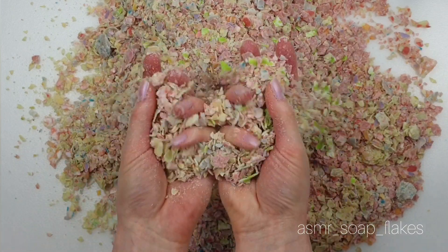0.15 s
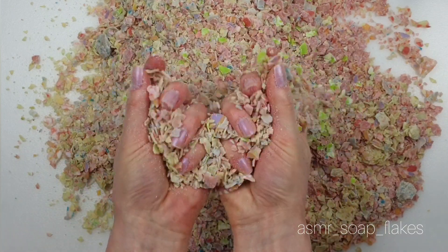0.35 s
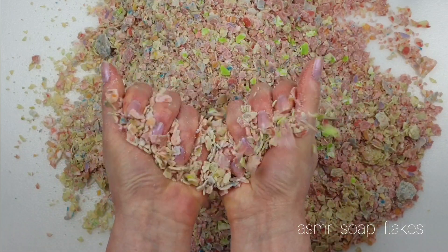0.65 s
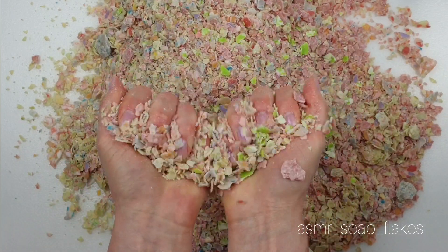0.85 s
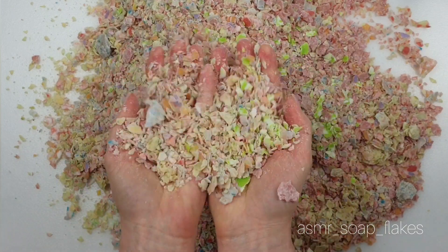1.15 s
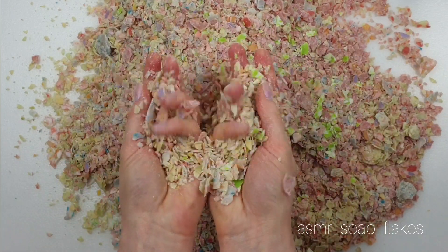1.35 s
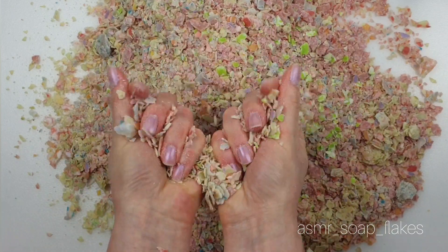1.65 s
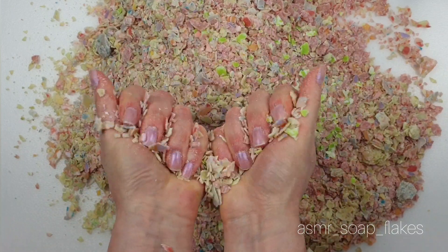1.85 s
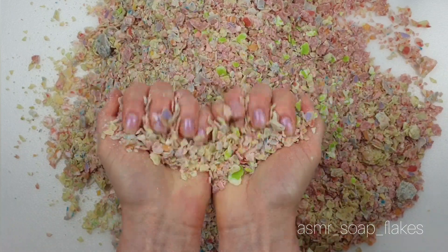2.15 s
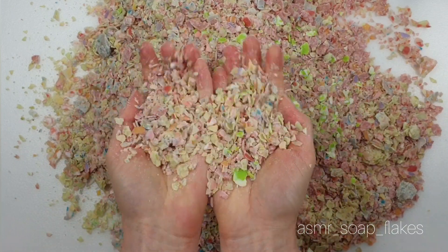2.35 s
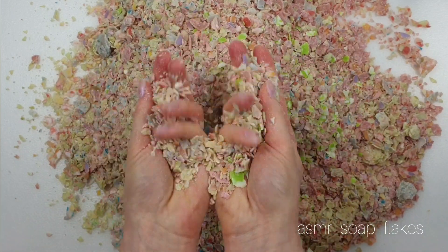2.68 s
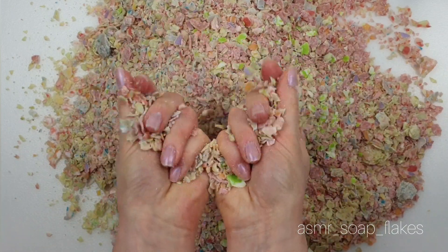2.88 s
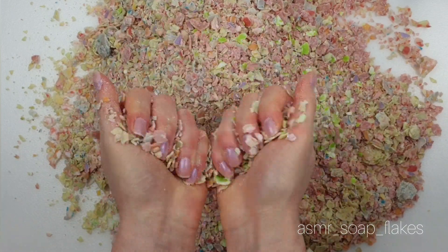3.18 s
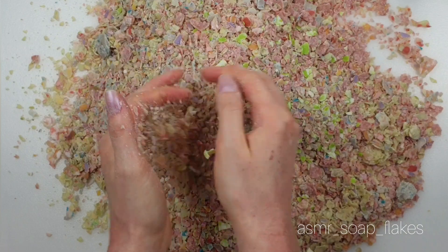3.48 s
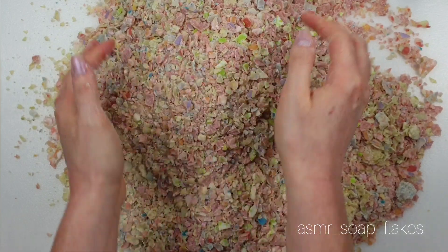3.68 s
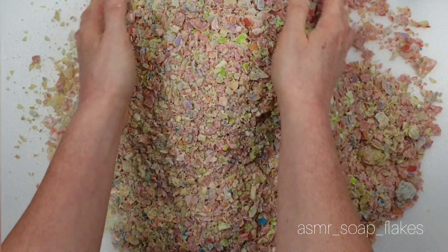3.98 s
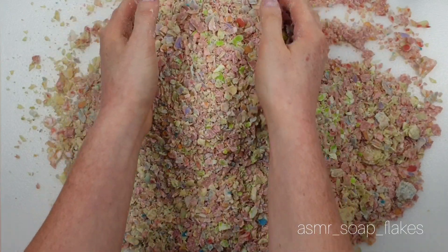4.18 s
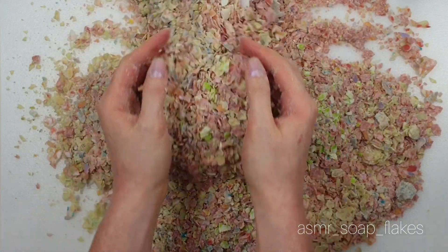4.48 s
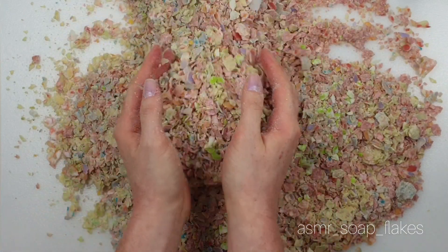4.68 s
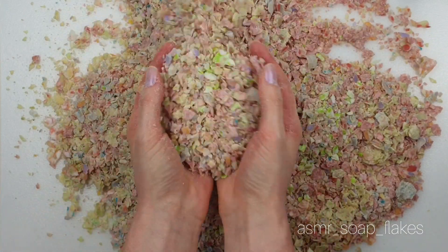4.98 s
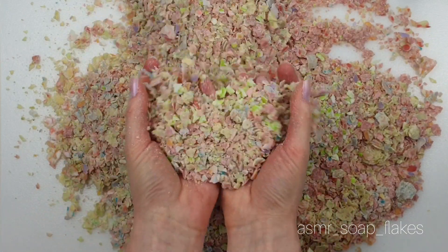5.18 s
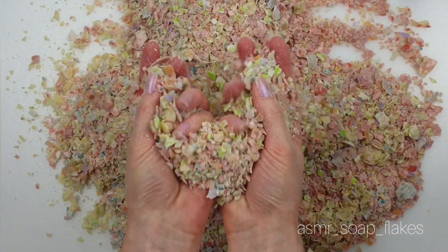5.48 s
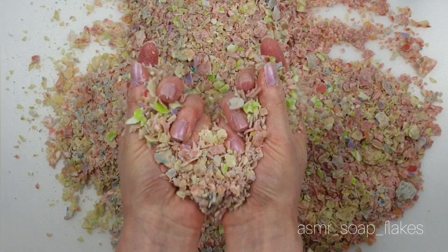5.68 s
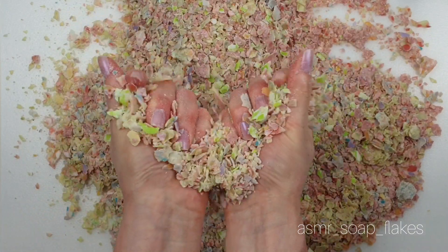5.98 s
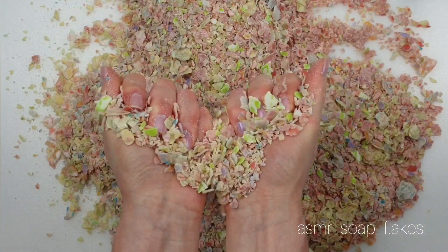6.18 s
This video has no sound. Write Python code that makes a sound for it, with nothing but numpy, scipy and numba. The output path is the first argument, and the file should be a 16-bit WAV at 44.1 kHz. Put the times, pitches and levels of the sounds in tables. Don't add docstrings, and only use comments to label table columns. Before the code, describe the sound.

Dry soap flakes are handled by two hands just under a spaced pair of microphones, in a small, quiet room with a faint low fridge hum. From 0 to 3 seconds the hands knead: thin, bright rustling, thousands of tiny ticks, swelling and easing, with many brittle snaps, strongest in the first second, including a sharp crack with a light knock near 1.0. A short slide swells around 1.65. Between 3.3 and 3.6 the flakes pour out in a bright rush, then nearly hush at about 3.8. Knocks at 3.86 start a firm push, a dull drumming, crunching sweep over the hard tabletop peaking near 4.0. From 4.3 to 5.1 gathering is softer, with muted rubbing. From 5.2 the kneading returns, fullest around 5.4 to 5.6, with crisp snaps, mostly slightly left, continuing to the end at about 6.3. Echo is very short.

```python
import sys
import numpy as np
from scipy import signal
from scipy.fft import rfft, irfft
from scipy.io import wavfile
from scipy.ndimage import uniform_filter1d
from numba import njit

SR = 44100
rng = np.random.default_rng(int(sys.argv[2]) if len(sys.argv) > 2 else 0)


def unload_wav(signal):
    wavfile.write(
        sys.argv[1],
        SR,
        np.round(np.clip(np.atleast_2d(signal).T, -1, 1) * 32767).astype(np.int16),
    )


def attenuation_scalar(level_db):
    decades = np.asarray(level_db, float) / 20
    return 10 ** decades


N = 279153
SPACING_S = .0005

# time_s, flow_db
SIFT = [(0, -41), (.22, -43), (.66, -49), (.97, -55), (1.5, -48.5), (1.87, -54.5), (2.2, -52), (2.55, -55),
        (2.97, -51), (3.29, -55), (3.7, -51.5), (3.84, -82.5), (3.94, -58), (4.4, -57), (4.95, -53),
        (5.17, -49.5), (5.3, -44.5), (6.33, -50)]
# pitch_hz, level_db (per Hz)
TICK_TOP = [(5000, -51.5), (8500, -14.5), (9630, -13), (12800, 1.5), (14400, -0.5), (16200, -7.5),
            (16400, -28), (16500, -77)]
# pitch_hz, level_db (per Hz)
TICK_MID = [(2240, -50.5), (3800, -16), (6020, -8), (6160, -7), (7180, -1), (8310, -11), (9500, -10),
            (12400, -23), (20900, -120)]
# pitch_hz, level_db (per Hz)
CRUNCH_TOP = [(1700, -34.5), (2500, -5), (3000, -4), (3500, -8.5), (4200, -1), (5500, -3.5), (8000, -42.5)]
# pitch_hz, width_hz, level_db
TABLE_MODES = [(220, 60, -9.5), (250.6, 20, -7), (324.6, 36, -12), (381.2, 36.7, -3), (446, 23, 0.5),
               (498.3, 27.4, -2.5), (595, 97, -7.5), (661, 71, -2.5), (736, 96.6, -1.5), (797, 138, -3.5),
               (953, 137, -7), (1148, 207, -12.5)]


def unit(x):
    return x / np.sqrt(np.mean(x ** 2))


def response(points, size=2048):
    hz, db = np.transpose(points)
    bins_hz = np.arange(size // 2 + 1) * SR / size
    log_gain = np.interp(np.log(bins_hz + 1), np.log(hz), db) * np.log(10) / 20
    cepstrum = irfft(log_gain)
    cepstrum[1:size // 2] *= 2
    cepstrum[size // 2 + 1:] = 0
    return irfft(np.exp(rfft(cepstrum)))


def through(x, h):
    return signal.fftconvolve(x, np.atleast_2d(h), axes=1)[:, :N]


def walk(rate):
    hold = int(SR / rate)
    goals = np.repeat(rng.standard_normal(N // hold + 1), hold)[:N]
    drift = signal.lfilter([1 / hold], [1, 1 / hold - 1], goals)
    return drift / drift.std()


@njit
def ring(at, hz, decay, size):
    out = np.zeros(N)
    for g in range(len(at)):
        first = int(at[g]) + 1
        turn = np.exp(2j * np.pi * hz[g] / SR - decay[g])
        swing = size[g] * turn ** (first - at[g])
        for j in range(first, min(N, first + int(6 / decay[g]) + 1)):
            out[j] += swing.real
            swing *= turn
    return out


def place(s, hz, ring_s, db, pan_db, side):
    one = np.ones(len(s))
    ears = []
    for ear in (-1, 1):
        at = np.clip((s + ear * side * SPACING_S / 2) * SR, 0, N)
        size = attenuation_scalar(db - ear * pan_db / 2) * one
        ears.append(ring(at, hz * one, one / (ring_s * SR), size))
    return np.array(ears)


def shower(rate, scatter_db, spread_db, width, ring_s, lo_hz, hi_hz):
    when, big, pitch, side = rng.random((int(rate * N / SR), 4)).T
    db = -scatter_db * np.log(1 - .985 * big)
    where = 2 * side - 1
    hz = lo_hz + (hi_hz - lo_hz) * pitch
    return unit(place(when * N / SR, hz, ring_s, db, spread_db * where, width * where))


def swells(table):
    s, db, rise_s, fall_s, share_db = np.transpose(table)[:, :, None]
    t = np.arange(0, N, 64) / SR - s
    power = attenuation_scalar(2 * db - 40 * np.maximum(-t / np.abs(rise_s), t / np.abs(fall_s)))
    return [np.repeat(np.sqrt(p.sum(0)), 64)[:N] for p in (power, power * attenuation_scalar(2 * share_db))]


def moving():
    # peak_s, level_db, rise_s and fall_s (per 20 dB),
    # mid_share_db (7 kHz part)
    surges = [(.33, -46.5, -1.5, 1, -22), (.6, -52.5, 5, 0.1, -1), (.86, -48.5, 1, .11, -12),
              (1.1, -50.5, 1.3, .2, -5.5), (1.43, -53, 0.5, -1, -9), (1.65, -44, 0.16, 0.16, -4),
              (2.68, -50.5, .2, 0, -17.5), (3.33, -46, 0.08, 0.54, -5.5), (3.5, -40.5, 0.22, 0.2, -10.5),
              (4.07, -48.5, 0.09, 0.13, 2), (4.29, -58, -0.3, 0.9, -1), (4.62, -53, 0.1, 0.07, -2.5),
              (4.84, -55.5, 0.5, 0.17, -1.5), (5.39, -43.5, .5, .5, -9.5), (5.6, -44.5, 0.45, -1, -9),
              (5.98, -49.5, -1.6, -1.2, -7.5), (6.16, -53, 1, 0, -2.5)]
    creep = attenuation_scalar(np.interp(np.arange(N) / SR, *np.transpose(SIFT)))
    surge, surge_mid = swells(surges)
    flow = np.hypot(creep, surge)
    return flow, np.hypot(creep * attenuation_scalar(-8.5), surge_mid) / flow


def air():
    # pitch_hz, level_db (per Hz)
    room_colour = [(12, -54), (20, -2), (65, -1), (118, 1), (154, -16), (240, -25.5), (446, -11.5),
                   (569, -32), (1350, -23.5), (4000, -21), (5200, -66), (8800, -120)]
    mid, side = through(rng.standard_normal((2, N)), response(room_colour, size=8192))
    side = signal.lfilter(*signal.butter(1, 500, "high", fs=SR), side) + 0.22 * side
    return attenuation_scalar(-76.5 + 2.5) * unit(np.array([mid + side, mid - side]))


def fridge():
    # pitch_hz, level_db (rms), phase_turns
    hum = [
        (49.22, -67.5, .33),
        (98.46, -75, -.03),
        (100.02, -71, -.36),
    ]
    t = np.arange(N) / SR
    lines = sum(np.sqrt(2) * attenuation_scalar(db) * np.cos(2 * np.pi * (f * t + turns)) for f, db, turns in hum)
    waver_db = 0.9 * uniform_filter1d(np.array([walk(5.5), walk(11)]), size=800)
    return lines * attenuation_scalar(np.array([[-.4], [.4]]) + waver_db)


def table_top(modes):
    t = np.arange(8192) / SR
    h = np.zeros(len(t))
    for k, (hz, width_hz, db) in enumerate(modes):
        swing = np.exp(-np.pi * width_hz * t) * np.sin(2 * np.pi * hz * t)
        h += (-1) ** k * attenuation_scalar(db) * width_hz * swing
    h = signal.sosfilt(signal.butter(3, 185, "high", fs=SR, output="sos"), h)
    return h / np.sqrt(np.sum(h ** 2))


def knocks():
    # start_s, peak_db, pitch_hz, pan_db (left minus right)
    hits = [(0.085, -36, 770, 2), (0.667, -29, 1784, 4.5), (0.929, -45.5, 496, -1), (0.996, -31, 1733, -2),
            (0.9968, -28, 2200, -2.5), (0.996, -18, 3980, -2), (1.493, -49.5, 750, 5), (1.532, -42, 830, 5),
            (1.581, -36.5, 510, 0.5), (1.596, -38, 520, 2), (1.719, -33.5, 1655, 4), (2.006, -47, 404, 1),
            (3.764, -55, 740, 3), (3.852, -44, 700, -3), (3.857, -26, 836, 0.5), (3.891, -30, 750, -1),
            (4.219, -35, 1040, 4.5), (5.186, -48, 820, 6), (5.235, -45, 930, 9), (5.327, -43, 483, 2.5),
            (5.549, -44, 810, 10), (6.22, -36, 740, -1.5), (6.282, -45.5, 417, 0.5)]
    s, db, hz, pan_db = np.transpose(hits)
    side = np.clip(-pan_db / 12, -1, 1)
    thump = place(s + 0.001954, hz, 1.53 / hz, db, pan_db, side)
    thump = thump + place(s + 0.002507, 1.035 * hz, 16 / hz, db - 24, pan_db, side)
    thump = signal.sosfilt(signal.butter(2, [300, 5000], "band", fs=SR, output="sos"), thump)
    return thump + attenuation_scalar(-27) * through(thump, table_top(TABLE_MODES))


def drag():
    # peak_s, drumming_db, rise_s and fall_s (per 20 dB), crunch_share_db
    pushes = [(.1, -57.5, 6, 0.86, -8.5), (.64, -69, 0.7, 0.6, 5.5), (.9, -62, .6, .5, -18),
              (1.03, -65, 0.14, 0.15, 7.5), (1.6, -58, 0.28, 0.31, -8.5), (1.73, -67, 0.06, 0.08, 8),
              (1.95, -75, 0.1, .3, 8), (2.1, -63.5, .35, 0.38, -12.5), (2.95, -74, 1.5, 1.6, -9),
              (3.12, -79, .3, -1.1, 4), (3.33, -67, .4, .5, -6), (3.55, -64, .5, .9, -11),
              (3.885, -49, .025, 0, -1.5), (4.02, -43, .17, .28, -7), (4.15, -56.5, 0.01, .25, 2.5),
              (4.3, -62, 0.5, 0.07, -6), (4.72, -56.5, 0.41, 0.31, -11), (5.19, -68, .08, 4, -5),
              (5.4, -58, 0.25, .55, -9), (5.93, -67, .3, .3, 2.5), (6.25, -59, 0.47, -12, -6)]
    # pitch_hz, level_db (per Hz)
    crunch_colour = [(700, -29), (1200, -1.5), (1750, 1.5), (2400, -5.5), (2900, -20), (5000, -74.5)]
    force, grind = swells(pushes)
    firmness = np.maximum(force / attenuation_scalar(-67), 1) ** 0.12
    deep = np.hypot(force * attenuation_scalar(-14) * firmness, attenuation_scalar(-82))
    spill = attenuation_scalar(-64) * (moving()[0] / attenuation_scalar(-42.5)) ** 1.65
    bright = np.hypot(force * attenuation_scalar(-9), spill)

    thuds = shower(rate=2500, scatter_db=2.5, spread_db=-1.5, width=.6, ring_s=0.00017, lo_hz=207, hi_hz=1600)
    grit = shower(rate=3000, scatter_db=2.5, spread_db=7.0, width=0.95, ring_s=0.00011, lo_hz=820, hi_hz=4970)
    drum = force * unit(through(thuds, table_top(TABLE_MODES[3:])))
    drum = drum + deep * unit(through(thuds, table_top(TABLE_MODES[:3])))
    crunch = grind * unit(through(grit, response(crunch_colour)))
    crunch = crunch + bright * unit(through(grit, response(CRUNCH_TOP)))
    return (drum + crunch) * attenuation_scalar(.9 * walk(25))


def all_snaps():
    # start_s, peak_db, mid_share_db (7 kHz part),
    # pan_db (left minus right), slide_db (slide set off)
    kneaded = [(.0377, -20, -7, 7.5, -46), (.3346, -28, -25, 6, -61), (.4962, -22, -17, 6, -45),
               (.5159, -27, -5, 9, -39), (.6691, -25, -3, 5.5, -38.5), (.7007, -25, -12, 14, -58),
               (.7773, -27.5, -6, 6.5, -46), (.7916, -21, -26, 15, -44), (.8296, -25, -35, 6, -42),
               (.8795, -26, -20, 5.5, -50), (.931, -21, -25, 3.5, -49), (.9818, -26.5, -10, -1, -50),
               (.9982, -16, -8, 4.5, -36.5), (1.0907, -30.5, 3.5, 2, -46), (1.1465, -34, 0, 1, -61),
               (1.3094, -28, -24, -1, -56), (1.5851, -27, -6, 2, -43), (1.6598, -26, -14.5, 5, -52),
               (1.8957, -39, -25, 1, -49), (1.9081, -26, -17, 12, -54), (2.0099, -33, -16.5, 8, -49.5),
               (2.4328, -27.5, -17.5, 3, -48), (2.5867, -29.5, -13, -1.5, -47.5),
               (2.692, -27, -22, 6, -42.5)]
    poured = [(3.0068, -30, -20, 12, -47), (3.0654, -25.5, -16, 10, -52), (3.107, -26, -23, 15, -56),
              (3.1964, -34, -12.5, 13, -47), (3.2523, -33, -21, 13, -65), (3.315, -35, -3, 3.5, -54),
              (3.4202, -31, -17, 17, -41.5), (3.485, -24, -30, 8, -55), (3.587, -27, -13, 28, -47),
              (3.668, -28.5, -17, 15.5, -52), (3.7652, -37, -1.5, 11, -57),
              (3.8584, -26.5, -0.5, 10.5, -49), (3.888, -25.5, -1.5, -5.5, -45.5),
              (5.218, -31, -17, 9, -43), (5.3068, -29, -11.5, 10, -54), (5.484, -26, -14.5, -3.5, -45),
              (5.697, -25.5, -16, 12, -41), (5.7624, -30, -33, 8, -62), (5.815, -27.5, -14, 6, -48),
              (5.8425, -25, -21, 2, -42), (5.9492, -24, -28, 12, -52), (6.0647, -32, -17, 12, -47),
              (6.1364, -59, -1, 6, -43), (6.2858, -24, -14, 4, -41)]
    # start_s, end_s
    spells = [
        (.2, 3.3),
        (5.2, 6.3),
    ]
    when, big, dull, where, slide = rng.random((50, 5)).T
    (a, b), (c, d) = spells
    first_s, total_s = b - a, b - a + d - c
    s = np.interp(when * total_s, [0, first_s, first_s, total_s], [a, b, c, d])
    db = np.interp(s, *np.transpose(SIFT)) + 14.5 + 4 * big
    slide_db = db - 27.5 + 9 * (slide - .5)
    small = np.array([s, db, -8 - 12 * dull, 1.5 + 12 * where, slide_db]).T
    return np.vstack([kneaded, poured, small]).T


def snaps(table):
    s, db, mid_db, pan_db, slide_db = table
    db = db + 2.2 - 10 * np.log10(np.cosh(pan_db * np.log(10) / 20))
    crumbs = rng.random((len(s), 3, 4))
    delay = 0.00094 * -np.log(1 - crumbs[:, 0])
    delay[:, 0] = 0
    drop_db = -7 - 10 * crumbs[:, 1]
    drop_db[:, 0] = 0
    side = np.clip(-pan_db / 15, -1, 1)[:, None] + 0.78 * (crumbs[:, 2] - .5)
    at = (s[:, None] + delay - .00015).ravel()
    t, ring_s = np.arange(64) / SR, .00006
    out = 0
    for colour, share_db, hz in ((TICK_TOP, 0 * db, 13000), (TICK_MID, mid_db, 6500),
                                 (CRUNCH_TOP, mid_db - 11, 3300)):
        h = response(colour)
        grain = np.exp(-t / ring_s) * np.cos(2 * np.pi * hz * t)
        peak = np.abs(np.convolve(h, grain)).max()
        piece_db = ((db + share_db)[:, None] + drop_db).ravel()
        breaks = place(at, hz, ring_s, piece_db, np.repeat(pan_db, 4), side.ravel())
        out = out + through(breaks, h / peak)
    return out


def slides(table):
    s, db, mid_db, pan_db, slide_db = table
    return place(s + .0005, 0., 0.017, slide_db + 1.5, .5 * pan_db, 0 * s)


def jams(table):
    s = table[0]
    lock = place(N / SR - s, 0., 0.015, -6.5 + 0 * s, 0, 0 * s)[:, ::-1]
    return 1 / (1 + lock)


def rustle(table):
    gain, share = moving()
    pan_db = np.clip(4.5 - 0.19 * (20 * np.log10(gain) + 48), 0, 6)
    ticks = shower(rate=4500, scatter_db=3.0, spread_db=9, width=1, ring_s=.00013, lo_hz=3000, hi_hz=17500)
    flicker_db = 1.0 * walk(40) + 1.2 * np.array([walk(90), walk(90)])
    creep = gain * jams(table) * attenuation_scalar(flicker_db + np.array([pan_db, -pan_db]) / 2)
    flow = np.sqrt(creep ** 2 + slides(table) ** 2)
    top = unit(through(ticks, response(TICK_TOP))) * attenuation_scalar(np.array([[.9], [-.9]]))
    mid = unit(through(ticks, response(TICK_MID))) * attenuation_scalar(np.array([[-2.2], [2.2]]))
    return flow * (top + share * attenuation_scalar(flicker_db[::-1]) * mid)


def echoes(near):
    t = np.arange(int(.3 * SR)) / SR
    fade = np.exp(-np.log(1000) * t / .09) * (t > .002)
    walls = rng.standard_normal((2, len(t))) * fade
    middle = np.repeat(near.mean(0, keepdims=True), 2, axis=0)
    return attenuation_scalar(-8) * through(middle, walls / np.sqrt(np.sum(walls[0] ** 2)))


def scene():
    table = all_snaps()
    near = rustle(table) + snaps(table) + drag() + knocks()
    return near + echoes(near) + fridge() + air()


def top_cut(x):
    return signal.sosfilt(signal.butter(12, 16970, fs=SR, output="sos"), x)


def record(dry):
    low_pass = signal.ellip(10, .2, 60, 15750, fs=SR, output="sos")
    return top_cut(signal.sosfilt(low_pass, dry))


dry = scene()
out = record(dry)
unload_wav(out)
```